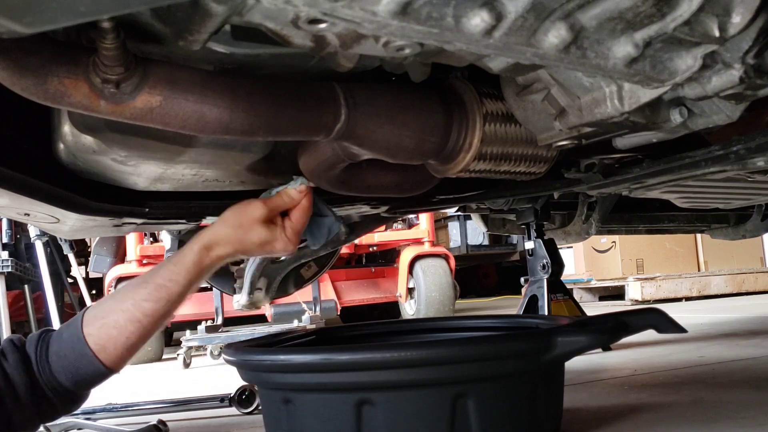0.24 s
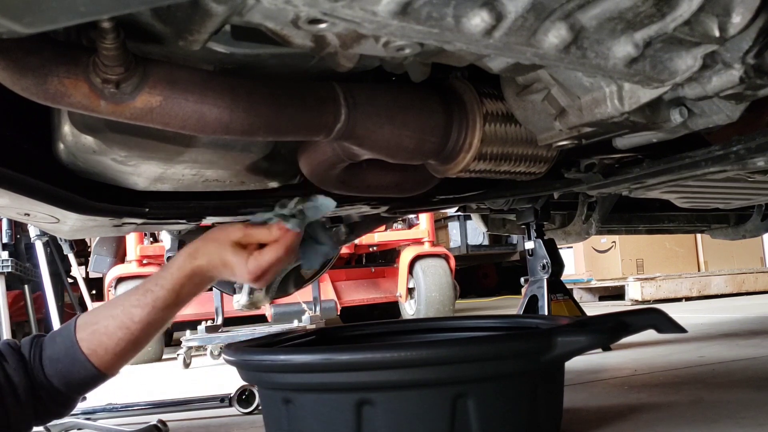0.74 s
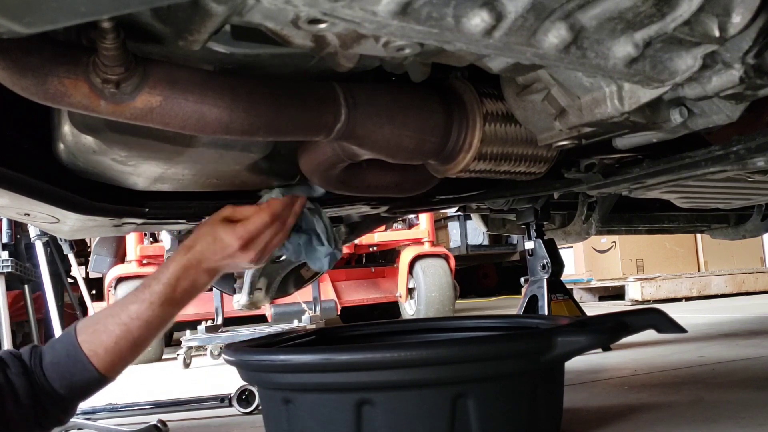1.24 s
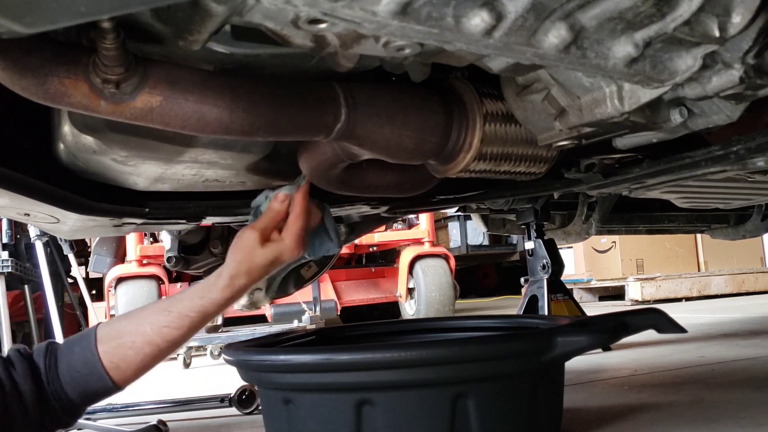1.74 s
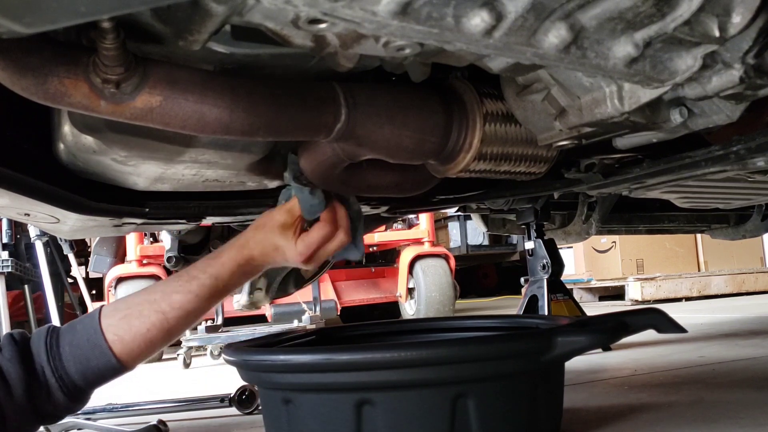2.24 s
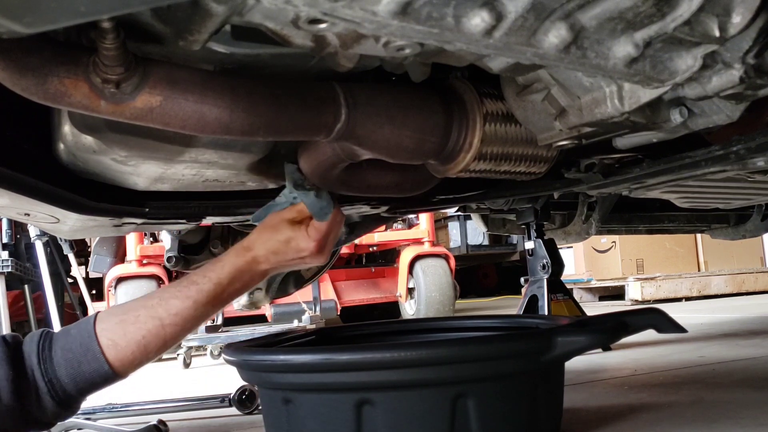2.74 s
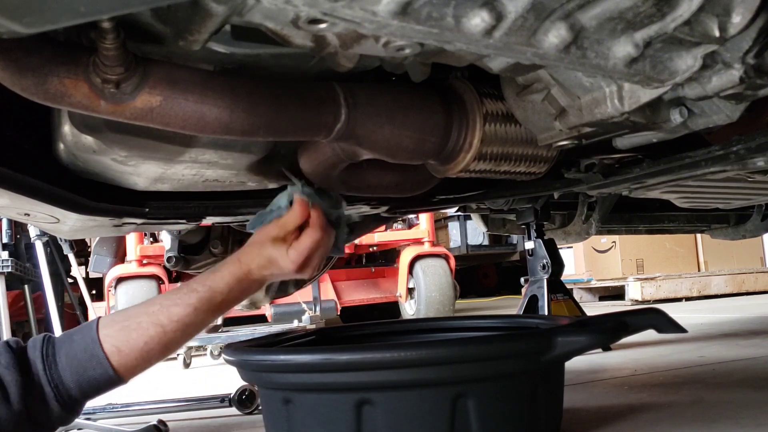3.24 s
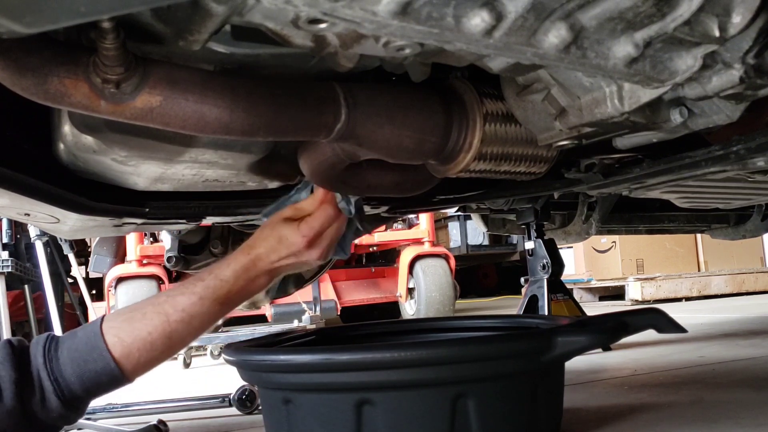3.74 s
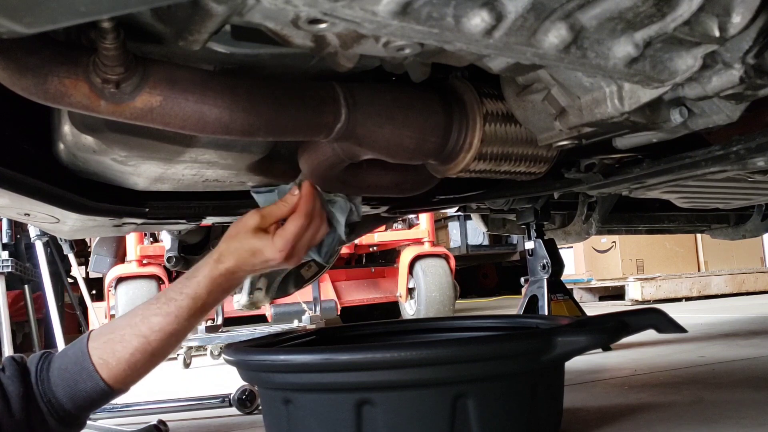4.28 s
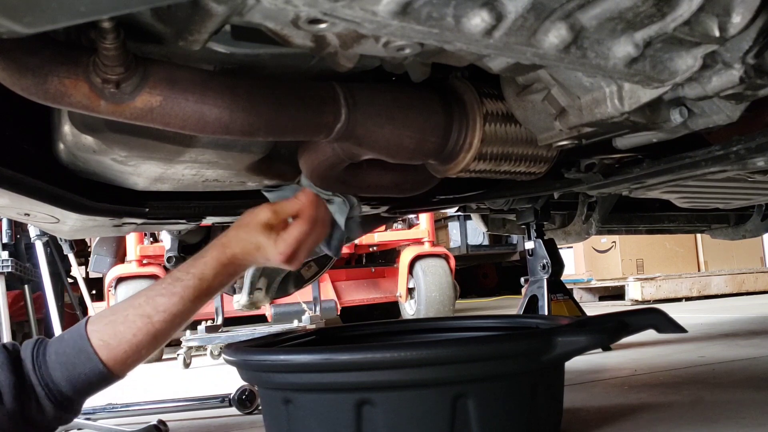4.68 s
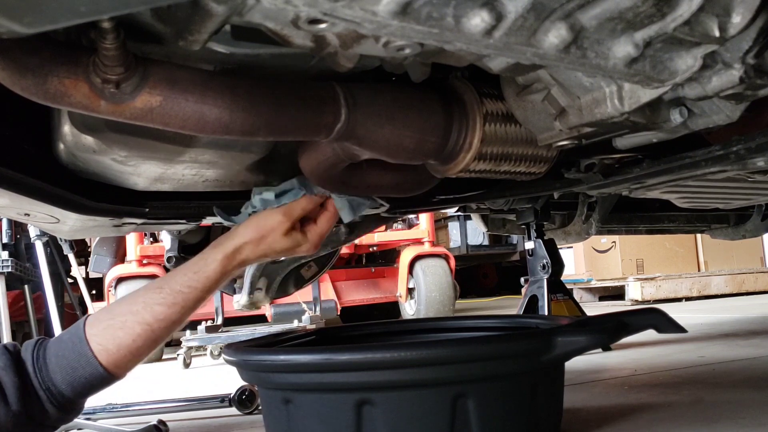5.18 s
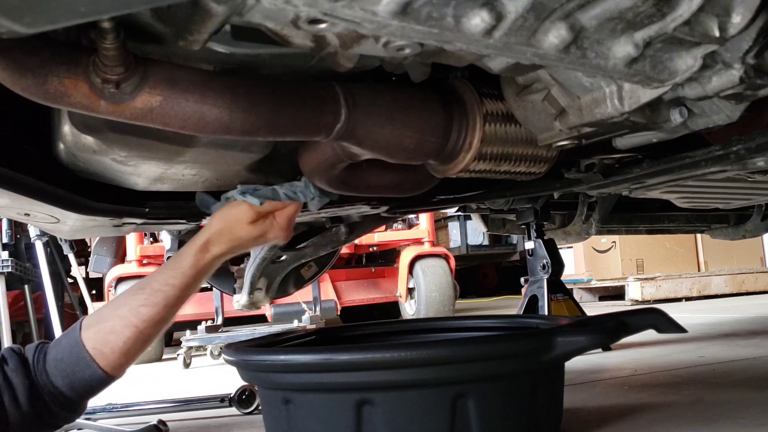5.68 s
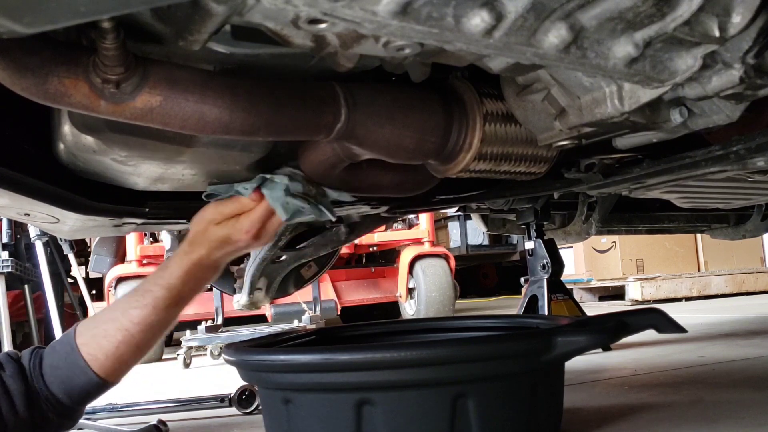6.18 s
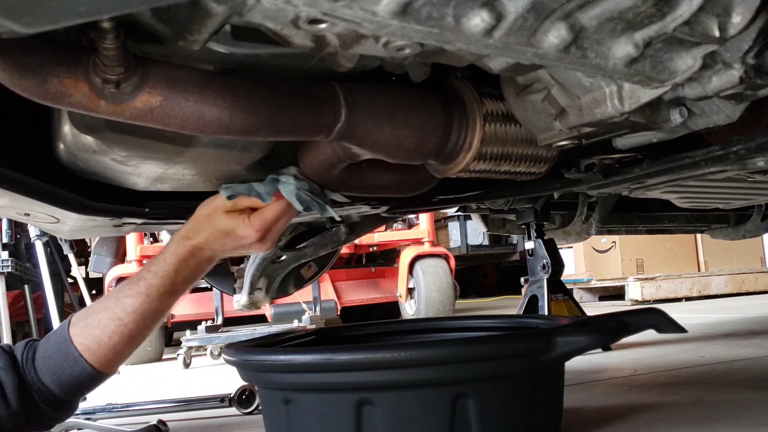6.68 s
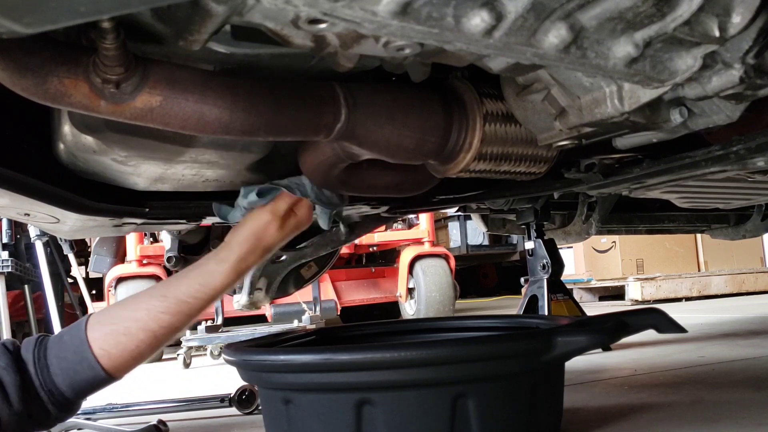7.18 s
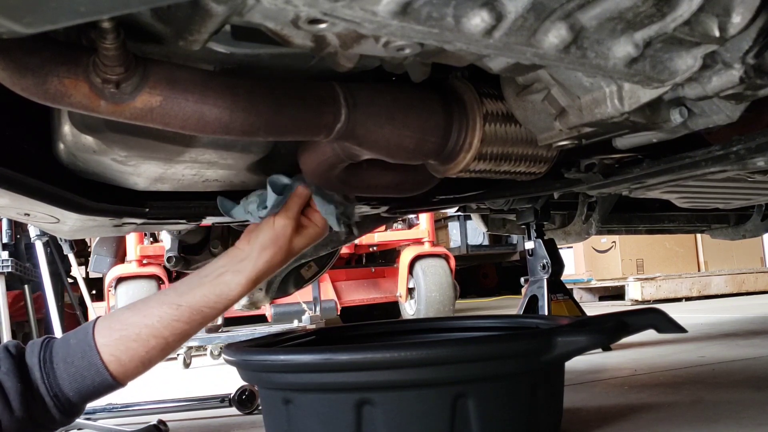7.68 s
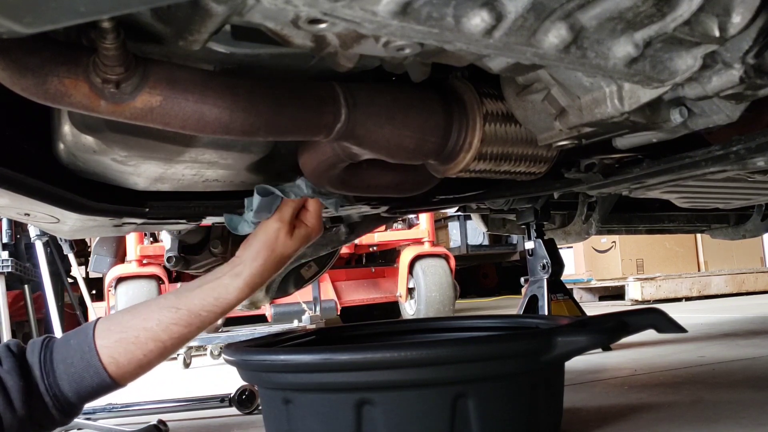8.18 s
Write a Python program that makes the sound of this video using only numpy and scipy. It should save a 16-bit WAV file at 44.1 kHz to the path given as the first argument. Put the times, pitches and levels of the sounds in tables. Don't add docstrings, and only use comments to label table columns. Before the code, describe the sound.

Quick dry swipes of cloth on cast metal, heard close in stereo beneath a car in an open garage. Distant traffic rumbles; a departing car's tyre wash fades over the first seconds while a husky little bird calls three times. The wiping continues in irregular bursts, with one hard knuckle knock just before four seconds, then small damped metal ticks, nail clicks and low body bumps, calming towards the end.

```python
import sys
import numpy as np
from scipy import signal
from scipy.fft import rfft, irfft, next_fast_len
from scipy.io import wavfile
from scipy.ndimage import uniform_filter1d, map_coordinates

SR = 44100
rng = np.random.default_rng(int(sys.argv[2]) if len(sys.argv) > 2 else 0)


def generate_wav(sig):
    pcm = np.round(np.clip(np.atleast_2d(sig).T, -1, 1) * 32767).astype(np.int16)
    wavfile.write(sys.argv[1], SR, pcm)


def undo_db(level):
    steps = np.asarray(level, float) / 20
    return 10 ** steps


N = 371322
WIPE_RISE, FLICK_RISE = 0.48, 0.36

# pitch_hz, share
NEAR = [(300, 1), (700, 0.48), (3000, 0.073), (7000, -0.026), (12000, -0.023)]


def rag():
    # pitch_hz, width_hz, level_db
    pan_rubbed = [(2870, 110, 5), (4300, 70, 2), (5040, 240, -6), (6600, 54, -0.5), (8320, 200, -2),
                  (9180, 220, -4.5), (11270, 140, -9), (11900, 47, -10), (12370, 26, -2), (13700, 74, -28),
                  (13900, 34, -7)]
    # pitch_hz, width_hz, level_db
    plug_modes = [(1885, 40, 1), (1790, 120, -15), (2780, 120, -15), (3985, 70, -17), (6725, 60, -18),
                  (11500, 60, -16)]
    # pitch_hz, level_db (per Hz)
    hiss_colour = [(1760, -22), (3000, -14), (5710, -5), (7150, -7.5), (8170, 0), (10500, 4.5),
                   (15100, 0.5), (16000, -5.5)]
    body_colour = [(240, -3.5), (400, -11.5), (667, -9), (1650, -1), (1880, 3.5), (2550, -4), (2790, -2),
                   (7110, -9), (8500, -5.5), (11000, -42), (18700, -120)]
    flex_colour = [(250, -2.5), (330, -2), (480, -3), (680, 8), (900, 1), (1300, -46), (2500, -120)]

    hiss_gain, body_gain, plug_gain, flex_gain = strokes()
    catch = undo_db(0.6 * wobble(45) + 1.4 * wobble(500)) * (0.83 + 0.15 * snags(rate=200, t60=0.025))
    metal = lambda hz: 1 + undo_db(-7) * np.abs(modes(pan_rubbed)(hz))
    hiss = rush(lambda hz: shape(hiss_colour)(hz) * metal(hz), NEAR, patchy_db=1.9)
    body = rush(lambda hz: shape(body_colour)(hz) * metal(hz), NEAR, patchy_db=1.6)
    flex = undo_db(5) * flex_gain * rush(shape(flex_colour), NEAR, patchy_db=1.5)
    grip = undo_db(-1.5 + 2.5 * wobble(40)) * plug_gain * rng.standard_normal((2, N))
    plug = filtered(grip, modes(plug_modes)) * np.sqrt(SR / 2 / 60)
    return catch * (undo_db(1.54) * hiss_gain * hiss + undo_db(1.0) * body_gain * body + flex) + plug


def strokes():
    # peak_s, length_s, hiss_db, press_db (body over hiss, more when pressed on metal)
    draws = [(.051, 0.061, -63.5, -5), (.478, 0.1, -53, -3), (.884, 0.074, -58, -14),
             (1.17, 0.044, -50, -23), (1.36, 0.27, -65, -6), (1.49, 0.027, -40, -10),
             (1.496, 0.09, -57, -1.5), (2.121, 0.091, -55, -34), (3.348, 0.095, -65, -9),
             (3.75, 0.055, -55, -7), (4.02, 0.12, -63, -8.5), (4.321, 0.15, -44.5, -2.5),
             (4.756, 0.044, -36.5, -10), (5.435, 0.048, -63.5, 3), (5.747, 0.14, -57.5, -6.5),
             (6.244, 0.12, -45.5, -5), (6.362, 0.11, -51, -1), (6.524, 0.068, -42, -6.5),
             (7.315, 0.081, -54, -5.5)]
    wipes = [(.201, 0.16, -60.5, -3.5), (.609, 0.19, -49.5, -4.5), (.989, 0.1, -49, -8),
             (1.217, 0.057, -39, -10), (1.685, 0.13, -58.5, -4.5), (2.226, 0.16, -55.5, -9),
             (2.393, 0.25, -60, -4.5), (2.746, 0.53, -62, -27), (3.171, 0.13, -64, -18),
             (3.47, 0.064, -42.5, -24), (3.665, 0.11, -58, -12), (3.88, 0.13, -54, -13),
             (4.201, 0.076, -41.5, -6), (4.549, 0.055, -49, -3.5), (4.63, 0.042, -79.5, 1),
             (4.9, 0.33, -75, -7), (5.11, 0.15, -52, -5), (5.265, 0.06, -59.5, -8),
             (5.15, 0.087, -70.5, 12.5), (5.536, 0.18, -67, -4.5), (5.889, 0.15, -50.5, -2.5),
             (6.14, 0.089, -53.5, -6), (3.535, 0.058, -67, -10), (8.4, .08, -78, -1), (1.45, .06, -53, -9),
             (.02, 0.065, -58, -10), (2.04, 0.065, -57, -33), (6.605, 0.056, -53, -6),
             (6.777, 0.12, -45.5, -5.5), (6.9, .07, -59, -8), (4.725, .04, -47, -8), (4.94, .06, -66, -30),
             (5.06, .07, -55, -10), (7.66, .08, -72, -3), (8.0, .08, -68, -6), (7.17, 0.21, -66, 0),
             (7.4, 0.086, -68, -12), (7.554, 0.2, -72, 0.5), (7.74, 0.04, -58, -8), (8.088, 0.085, -55, -5),
             (8.334, 0.074, -64.5, -5.5)]
    flicks = [(1.806, 0.072, -42.5, -10), (2.745, 0.046, -56, -5), (2.8, 0.47, -75, -18),
              (2.95, 0.038, -37, -10), (3.057, 0.021, -59, -29), (6.059, 0.074, -45.5, -8.5),
              (7.088, 0.074, -47.5, -7), (7.09, 0.022, -41.5, -14), (7.736, 0.075, -56, -1.5),
              (7.79, 0.086, -61.5, 1), (7.912, 0.07, -58.5, -6.5), (8.177, 0.071, -55.5, -7.5)]
    snatches = [(.052, 0.0079, -51, -7), (.6, 0.023, -48.5, -4), (1.405, 0.061, -55, -9.5),
                (1.913, 0.11, -59.5, -15), (3.42, 0.034, -54, -35), (3.635, 0.025, -57, -24),
                (4.668, 0.015, -61.5, -1), (4.704, 0.063, -48.5, -3), (.803, 0.062, -61, -18),
                (4.749, 0.01, -46.5, -17.5), (5.29, 0.022, -52, -25), (5.297, 0.088, -47.5, -2),
                (6.027, 0.012, -50, -10), (2.944, .01, -44, -8), (7.731, .01, -52, -3),
                (6.981, 0.043, -63.5, -11.5), (1.328, 0.0051, -61.5, 0), (8.329, 0.011, -53.5, -14)]
    # peak_s, length_s, level_db
    heavy_drags = [
        (4.232, 0.06, -61.5),
        (4.366, 0.046, -69),
        (4.763, 0.27, -78),
        (5.87, 0.3, -74.5),
        (6.778, 0.17, -74.5),
        (2.14, 0.092, -73),
        (6.11, 0.068, -72),
    ]
    # peak_s, length_s, level_db
    plug_sings = [(1.476, .06, -62), (2.73, .05, -70), (2.923, 0.026, -61), (4.56, 0.052, -67),
                  (4.717, 0.09, -58), (5.1, .15, -69), (5.323, .1, -63), (5.2, .08, -71), (5.413, .04, -66),
                  (6.07, .04, -61), (6.33, .04, -74), (7.709, 0.046, -62), (7.72, 0.028, -52),
                  (8.112, .1, -68), (8.215, .06, -76), (8.322, 0.064, -69)]
    plug_under_body_db = -12.5

    power = np.zeros((4, N))
    for rows, rise in [(draws, 0.61), (wipes, WIPE_RISE), (flicks, FLICK_RISE), (snatches, 0.14)]:
        for s, length, db, press_db in rows:
            i, envelope = swell(s, length, rise)
            body_db = db + press_db
            power[:3, i] += undo_db([[db], [body_db], [body_db + plug_under_body_db]]) ** 2 * envelope
    add_swells(power[3], heavy_drags, WIPE_RISE)
    add_swells(power[2], plug_sings, WIPE_RISE)
    return np.sqrt(power)


def add_swells(power, rows, rise):
    for s, length, db in rows:
        i, envelope = swell(s, length, rise)
        power[i] += undo_db(db) ** 2 * envelope


def swell(s, length, rise):
    i = np.arange(max(round((s - 0.3) * SR), 0), min(round((s + 0.35) * SR), N))
    late = i / SR - s
    side = length * np.where(late < 0, rise, 1 - rise)
    return i, np.exp(-2 * np.abs(late / side) ** 1.55)


def snags(rate, t60):
    hits = (rng.random(N) < rate / SR) * rng.exponential(1, N)
    return signal.lfilter([1], [1, -undo_db(-60 / (t60 * SR))], hits)


def ribs():
    # peak_s, length_s, level_db
    rib_rubs = [
        (2.744, .08, -61.5),
        (2.843, .12, -65),
        (5.15, .08, -68),
        (5.3, 0.046, -65),
    ]
    # pitch_hz, width_hz, level_db
    rib_modes = [(1640, 250, -1), (1930, 390, 1)]
    power = np.zeros(N)
    add_swells(power, rib_rubs, FLICK_RISE)
    skin = filtered(rng.standard_normal((2, N)), lambda hz: modes(rib_modes)(hz) ** 2)
    return np.sqrt(power) * unit(skin)


def knuckle_tap():
    # start_s, level_db
    knuckle_blow = (3.7855, -23)
    pan_pitches = [921, 969, 1040, 1255, 1331, 1468, 1006, 1600, 860, 1150, 1516, 1760, 1883, 2374, 2760,
                   2890, 2985, 3983, 4025, 4307, 5100, 5679, 6725, 6780, 8570, 9350, 11080, 11510, 12400]
    # level_db, t60_s
    pan_decays = [(-8, 0.11), (-2, 0.075), (-10.5, 0.078), (-12, 0.22), (1, 0.078), (-10.5, 0.2),
                  (-14, 0.16), (-39, 0.19), (-23, 0.12), (-28, 0.2), (-20, 0.23), (-7, 0.08), (8.5, 0.055),
                  (-17, 0.16), (-9, 0.05), (-12.5, 0.1), (-9, 0.065), (-2, 0.06), (-10.5, 0.07),
                  (-21.5, 0.13), (-5.5, 0.04), (-10.5, 0.1), (-1.5, 0.049), (-23.5, 0.081), (-6, .05),
                  (-1.5, 0.031), (-9, 0.045), (-4.5, 0.057), (-3.5, 0.055)]

    t = np.arange(SR // 2) / SR
    ring = np.zeros((2, len(t)))
    for hz, (db, t60) in zip(pan_pitches, pan_decays):
        build = 1 - np.exp(-t * (hz / 1000) ** 2 / 0.019)
        ring += undo_db(db - 60 * t / t60) * unsteady(hz, t, spread=0.68, wander=0.012) * build
    crack = band(rng.standard_normal((2, len(t))) * undo_db(4.5 - 60 * t / 0.052), 2500, 13500)
    shiver = band(rng.standard_normal((2, len(t))) * undo_db(-7.5 - 60 * t / 0.26), 900, 5000)
    blow = ring + shiver * (1 - np.exp(-t / 0.002)) + crack * (1 - np.exp(-t / 0.0022))

    out = np.zeros((2, N + SR))
    start, db = knuckle_blow
    out[:, round(start * SR):][:, :len(t)] += undo_db(db) * blow
    return out[:, :N]


def light_touches():
    # start_s, level_db
    thumb_ticks = [(1.485, -44), (2.935, -39.5), (3.753, -44), (3.95, -53), (4.18, -58), (4.198, -41),
                   (4.541, -48), (4.556, -49), (4.575, -48), (4.668, -51), (4.7, -41.5), (4.742, -37.5),
                   (4.759, -49), (5.079, -62), (5.14, -52), (5.287, -56), (5.344, -57), (6.514, -45),
                   (7.728, -40), (7.738, -38), (8.171, -54.5)]
    # pitch_hz, swell_s, t60_s
    plug_ring = (1885, .004, .085)
    # start_s, level_db, pitch_hz
    palm_nudges = [(4.578, -45.5, 1490), (4.735, -41, 1313), (4.79, -59, 4300), (5.145, -52, 1790),
                   (5.272, -50, 1750), (4.73, -43, 5100), (4.723, -51, 3985), (6.49, -50, 3985),
                   (6.78, -46, 3985), (6.655, -63, 2800), (7.07, -48, 3000), (7.07, -54, 5100),
                   (7.073, -51, 5650), (7.075, -52, 6500), (5.33, -46, 1484), (5.37, -51, 1450),
                   (5.42, -60, 3000), (5.51, -57, 2830), (6.255, -47, 1310), (6.52, -48, 865),
                   (6.58, -59, 2820), (6.808, -46, 860), (7.075, -43, 1335), (7.288, -42, 870),
                   (7.712, -50.5, 3950), (7.757, -49, 865)]
    # swell_s, t60_s
    panel_ring = (.022, .12)
    # start_s, level_db
    nail_clicks = [
        (4.701, -54),
        (5.287, -46),
        (5.428, -56),
        (7.088, -53),
    ]
    # pitch_hz, level_db, t60_s
    bolt_modes = [(11900, 2, 0.054), (12300, -2.5, 0.16), (13500, -5, 0.055), (13860, 2, .045),
                  (15460, 1, .04)]

    touches = [(s, db, *plug_ring) for s, db in thumb_ticks]
    touches += [(s, db - 17, 3985, 0.004, 0.06) for s, db in thumb_ticks]
    touches += [(*row, *panel_ring) for row in palm_nudges]
    for s, db in nail_clicks:
        touches += [(s, db + mode_db, hz, 0.001, t60) for hz, mode_db, t60 in bolt_modes]

    out, t = np.zeros((2, N + SR)), np.arange(SR // 4) / SR
    damp = undo_db(1.8 * wobble(70))
    for s, db, hz, rise, t60 in touches:
        start = round(s * SR)
        ring = unsteady(hz, t, spread=0.4, wander=0.038) * (1 - np.exp(-(t / rise) ** 2))
        out[:, start:][:, :len(t)] += undo_db(db - 60 * t / t60) * ring * np.resize(damp[start:], len(t))
    return out[:, :N]


def unsteady(hz, t, spread, wander):
    drift = wander * np.sqrt(hz / 2000) * np.cumsum(rng.standard_normal(len(t)))
    return np.sin(2 * np.pi * hz * t + drift + rng.normal(0, spread, (2, 1)))


def bumps():
    # peak_s, length_s, level_db
    forearm_bumps = [
        (4.333, 0.13, -55),
        (5.352, 0.13, -59),
        (6.772, 0.042, -50.5),
        (7.265, 0.105, -62.5),
        (8.092, 0.095, -55),
    ]
    # pitch_hz, level_db (per Hz)
    boom_colour = [(60, -41), (110, 7), (230, 2), (400, -7), (600, -20), (1200, -51)]
    power = np.zeros(N)
    add_swells(power, forearm_bumps, FLICK_RISE)
    return np.sqrt(power) * unit(filtered(rng.standard_normal(N), shape(boom_colour)))


def bird():
    # start_s, length_s, from_hz, to_hz, level_db
    syllables = [(.078, .028, 6150, 6050, -67), (.103, .052, 5840, 5860, -63), (.155, .05, 5860, 5860, -66),
                 (.198, .035, 5900, 6120, -70), (.225, .035, 6450, 6650, -71),
                 (.252, .028, 6950, 7100, -67), (.278, .018, 7300, 7600, -70),
                 (.288, .025, 8100, 8250, -66), (.803, .065, 6050, 6020, -70),
                 (.865, .022, 5900, 5820, -68), (.885, .075, 5950, 6080, -70),
                 (.972, .035, 6450, 6700, -70), (1.005, .025, 6900, 7200, -72),
                 (1.026, .032, 7350, 7500, -67), (1.058, .045, 7600, 7600, -72),
                 (1.095, .04, 7950, 8050, -73), (1.648, .032, 6020, 6060, -67),
                 (1.678, .055, 5800, 5950, -65), (1.735, .035, 6050, 6090, -68),
                 (1.772, .05, 6100, 6150, -66), (1.83, .035, 6550, 6650, -69),
                 (1.862, .025, 6850, 6850, -68), (1.892, .03, 6750, 6950, -68),
                 (1.92, .035, 6900, 7050, -67), (1.952, .025, 7450, 7650, -68),
                 (1.976, .022, 7750, 7950, -66), (1.996, .02, 7620, 7600, -71)]
    out = np.zeros(N)
    flutter_hz = 20 * wobble(35) + 60 * wobble(250)
    tremble_db = 2.5 * wobble(60) + 2.5 * wobble(220)
    husk_db = 2 * wobble(80)
    for s, length, from_hz, to_hz, db in syllables:
        i = np.arange(round(s * SR), round((s + length) * SR))
        share = np.linspace(0, 1, len(i))
        hz = from_hz + (to_hz - from_hz) * share + flutter_hz[i]
        envelope = np.sqrt(np.abs(np.sin(np.pi * share)))
        out[i] += envelope * undo_db(db + tremble_db[i] + husk_db[i]) * tone(hz)
    return np.array([out, undo_db(4) * np.roll(out, 7)])


def street():
    # time_s, level_db
    traffic_swell = [(0, -50), (.12, -49), (.6, -51), (1.3, -50), (1.8, -47), (2.5, -53), (4.2, -53),
                     (4.8, -56.5), (5.4, -49), (6.8, -52.5), (7.6, -54.5), (8.42, -51.5)]
    # pitch_hz, level_db (per Hz)
    rumble_colour = [(12, -63), (20, -32), (65, 2), (81, 1.5), (130, -11), (170, -36), (290, -120)]
    drone_colour = [(53, -36), (90, -5.5), (132, -4.5), (210, -14), (269, -14.5), (328, -16.5),
                    (440, -31.5), (600, -37), (780, -64), (1320, -120)]
    tyre_colour = [(240, -44.5), (400, -14), (671, -8.5), (993, 2.5), (1740, -3), (2740, -35), (3380, -38),
                   (3800, -41.5), (5000, -45), (6500, -64), (11000, -120)]
    spray_colour = [(900, -64.5), (1500, -3), (1900, -0.5), (2700, -13), (3500, -40), (6000, -62)]
    # pitch_hz, share
    far_alike = [(60, 0.96), (250, 1), (500, 1), (1200, 0.27), (4000, 0.01)]
    # start_s, end_s, from_hz, to_hz, level_db
    exhaust = (.12, .88, 134, 119, -57)

    t = np.arange(N) / SR
    away = 1 / (1 + t / 1.19)
    traffic = undo_db(np.interp(t, *np.transpose(traffic_swell)))
    rumble = traffic * undo_db(0.2 + 1.1 * wobble(2.66)) * rush(shape(rumble_colour), far_alike, patchy_db=1.2)
    drone_gain = np.hypot(undo_db(-60.5), undo_db(-52) * away)
    drone = drone_gain * undo_db(0.86 * wobble(5.4)) * rush(shape(drone_colour), far_alike, patchy_db=1.5)
    tyre_gain = undo_db(-59.5 + 4.0 + 1.2 * wobble(2.436)) * away ** 0.91
    tyres = tyre_gain * rush(shape(tyre_colour), far_alike, patchy_db=1.5)
    spray = undo_db(-55.5) * away ** 2.4 * rush(shape(spray_colour), far_alike, patchy_db=2.0)

    start, end, from_hz, to_hz, db = exhaust
    heard = np.clip(np.minimum(t - start, end - t) / 0.033, 0, 1)
    glide_hz = np.interp(t, [start, end], [from_hz, to_hz])
    note = heard * undo_db(db + 3.0 + 1.88 * wobble(17.2)) * tone(glide_hz)
    idle_s, idle_half_s, idle_db = 1.45, 0.88, -49.5
    idle_swell = np.exp(-((t - idle_s) / idle_half_s) ** 2)
    idle = undo_db(idle_db + 4 * wobble(9)) * idle_swell * tone(70 + 2 * wobble(6))

    far = rumble + drone + tyres + spray + note + idle
    return np.array([far[0], np.roll(far[1], 16)])


def air():
    # pitch_hz, level_db (per Hz)
    air_colour = [(880, -41), (1500, -33.5), (2300, -22), (2770, -29.5), (3030, 1.5), (6830, -30),
                  (8660, 8), (14600, 5.5), (16000, 7.5)]
    return undo_db(-70) * rush(shape(air_colour), [(3000, 0.1)], patchy_db=1.6)


def garage(x):
    # pitch_hz, t60_s
    echo_decay = [(500, 0.76), (2000, 0.21), (10000, 0.012)]
    hz, t, z = signal.stft(rng.standard_normal((2, SR // 2)), SR, nperseg=256)
    tail = signal.istft(z * undo_db(-60 * t / along(echo_decay, hz)[:, None]), SR, nperseg=256)[1]
    late = np.pad(x, ((0, 0), (300, 0)))
    return signal.fftconvolve(late, tail / np.linalg.norm(tail[0]), axes=1)[:, :N]


def unit(x):
    return x / np.sqrt(np.mean(x ** 2) + 1e-20)


def along(points, hz):
    f, v = np.transpose(points)
    return np.interp(np.log(hz + 1), np.log(f + 1), v)


def shape(points):
    return lambda hz: undo_db(along(points, hz))


def wobble(rate):
    return map_coordinates(rng.standard_normal(int(N * rate / SR) + 4), [np.arange(N) * rate / SR])


def tone(hz):
    return np.sin(2 * np.pi * np.cumsum(hz) / SR)


def band(x, low_hz, high_hz):
    return signal.sosfilt(signal.butter(2, [low_hz, high_hz], "band", fs=SR, output="sos"), x)


def filtered(x, response):
    m = next_fast_len(N + SR // 2)
    return irfft(rfft(x, m) * response(np.fft.rfftfreq(m, 1 / SR)), m)[..., :N]


def modes(peaks):
    def response(f):
        total = 0
        for k, (c, w, db) in enumerate(peaks):
            total = total + (-1) ** k * undo_db(db) * 1j * f * w / (c * c - f * f + 1j * f * w)
        return total
    return response


def rush(colour, alike, patchy_db):
    z = signal.stft(rng.standard_normal((2, N)), nperseg=512)[2]
    field = uniform_filter1d(uniform_filter1d(rng.standard_normal(z.shape[1:]), 6, 0), 8, 1)
    pair = signal.istft(z * undo_db(patchy_db * unit(field)), nperseg=512)[1][:, :N]
    turn = lambda hz: np.arccos(np.clip(along(alike, hz), -1, 1)) / 2
    mid, side = filtered(pair, lambda hz: colour(hz) * [np.cos(turn(hz)), np.sin(turn(hz))])
    return unit(np.array([mid + side, mid - side]))


def scene():
    cloth, knock, call = rag(), knuckle_tap() + light_touches(), bird()
    echoes = garage(undo_db(-16) * knock + undo_db(-15) * cloth + undo_db(-2) * call)
    return cloth + ribs() + knock + bumps() + call + street() + air() + echoes


def top_cut(x):
    return signal.sosfilt(signal.butter(12, 16550, fs=SR, output="sos"), x)


def record(dry):
    # pitch_hz, left_minus_right_db
    port_lean = [(60, 2), (250, 1), (500, -3.5), (1000, -5), (2000, 2.5), (8000, 1), (13000, -3.2)]
    ports = lambda hz: undo_db(along(port_lean, hz) * [[0.5], [-0.5]]) * (hz < 15850)
    return top_cut(filtered(dry, ports))


dry = scene()
out = record(dry)
generate_wav(out)
```